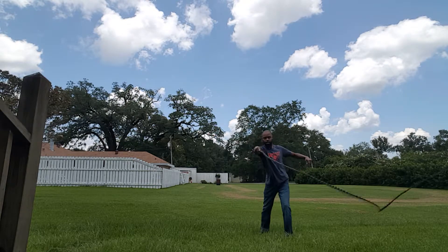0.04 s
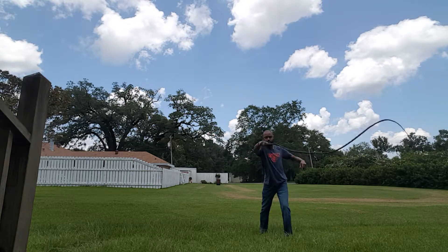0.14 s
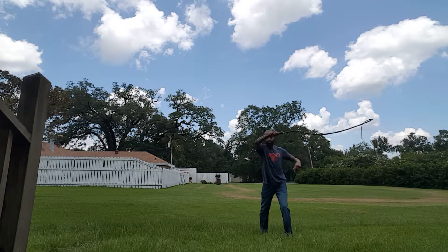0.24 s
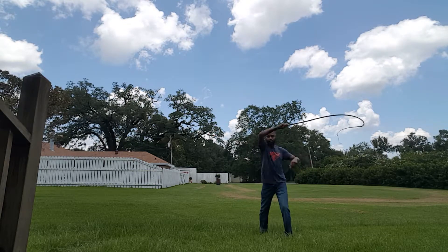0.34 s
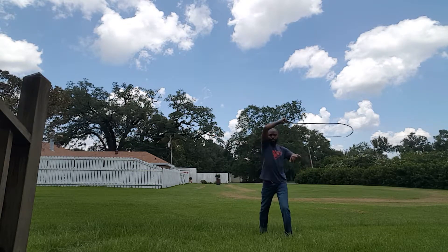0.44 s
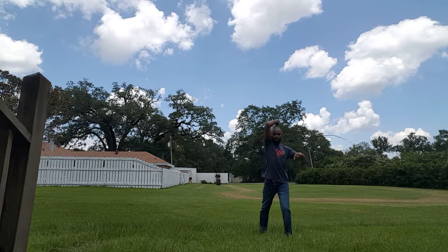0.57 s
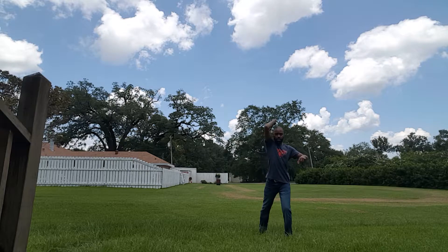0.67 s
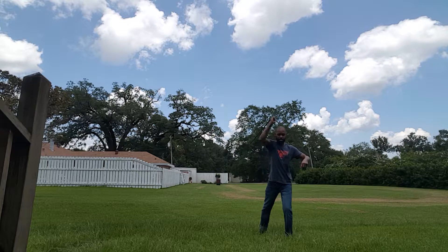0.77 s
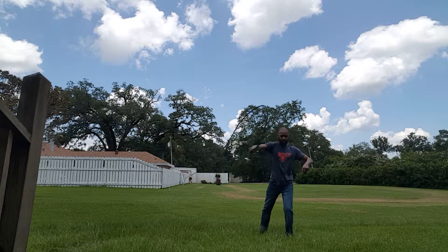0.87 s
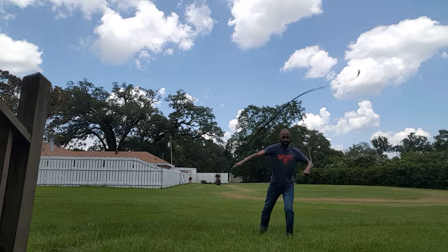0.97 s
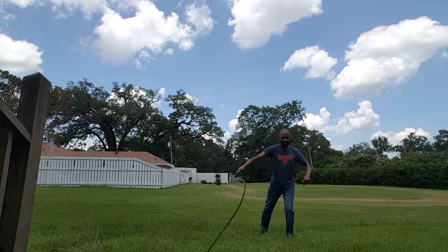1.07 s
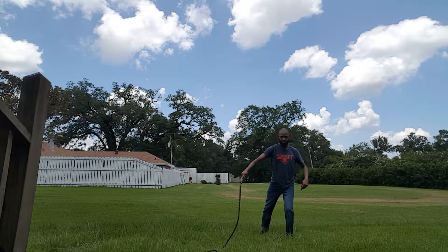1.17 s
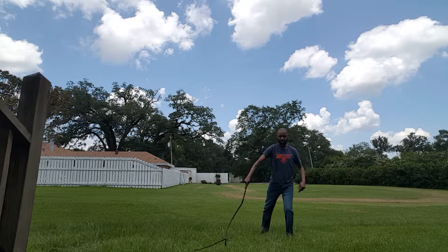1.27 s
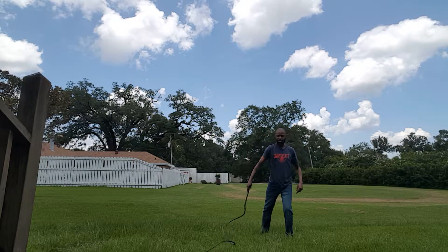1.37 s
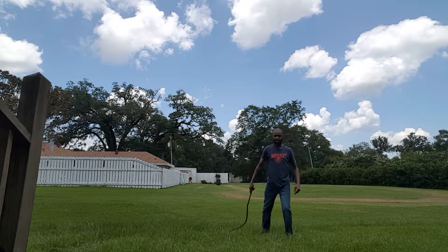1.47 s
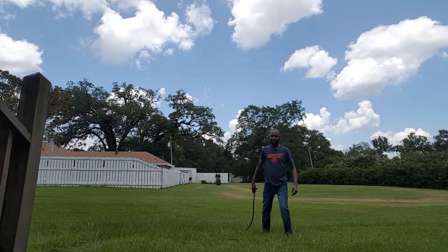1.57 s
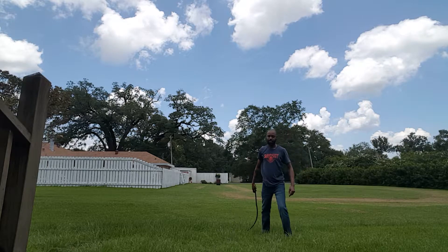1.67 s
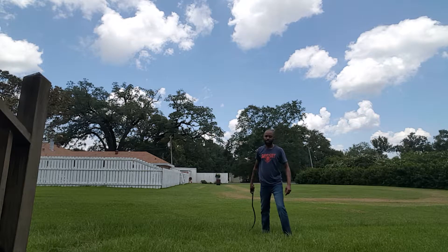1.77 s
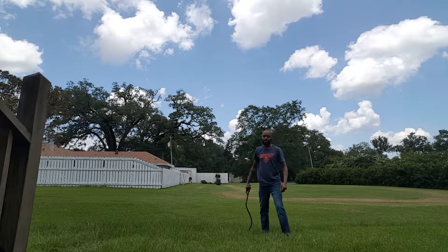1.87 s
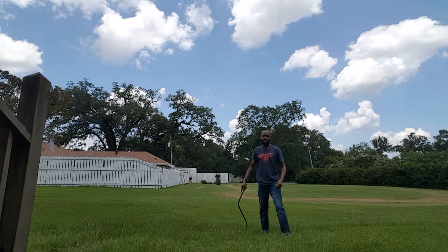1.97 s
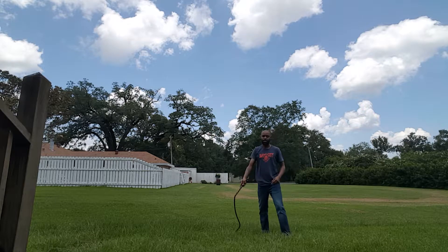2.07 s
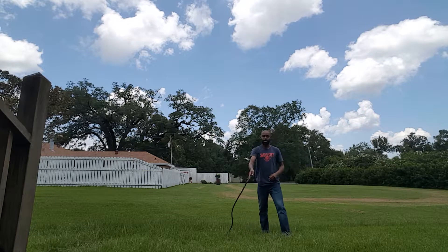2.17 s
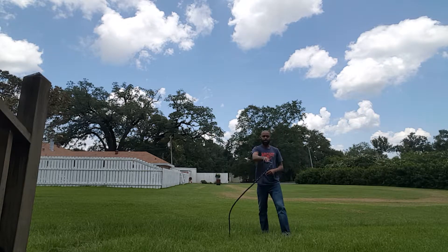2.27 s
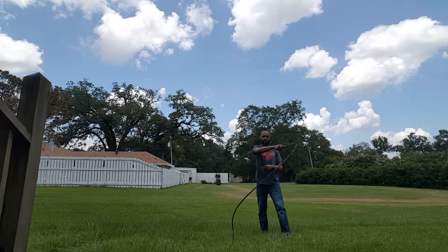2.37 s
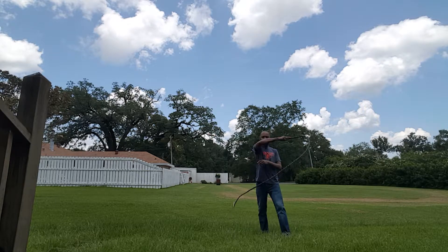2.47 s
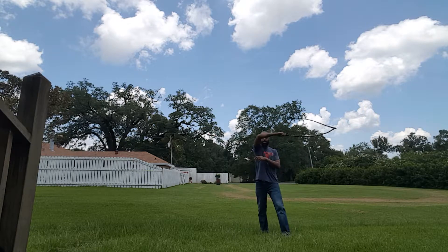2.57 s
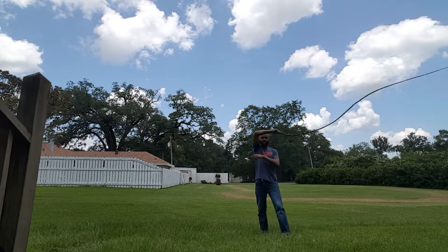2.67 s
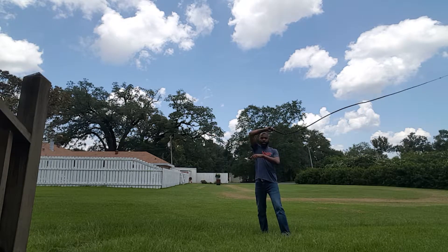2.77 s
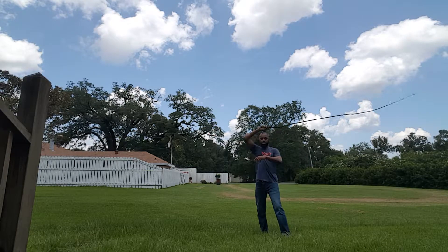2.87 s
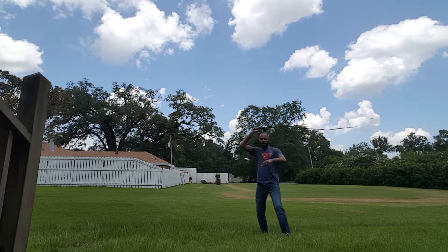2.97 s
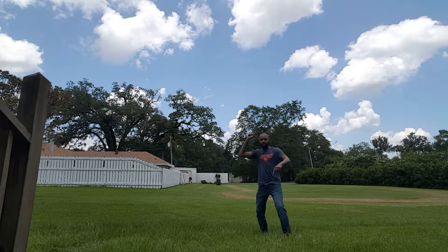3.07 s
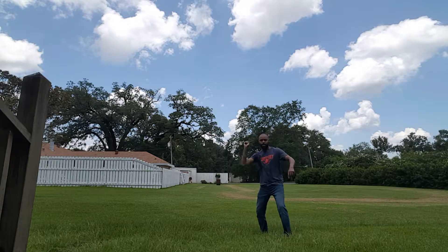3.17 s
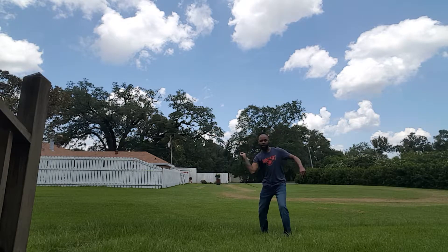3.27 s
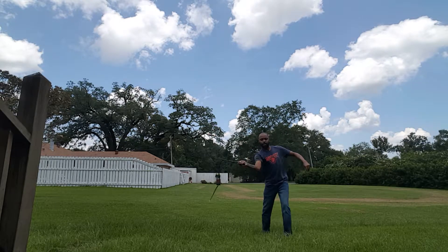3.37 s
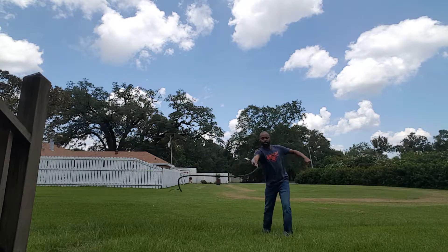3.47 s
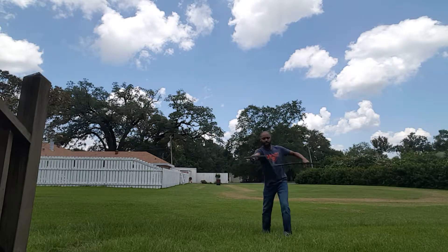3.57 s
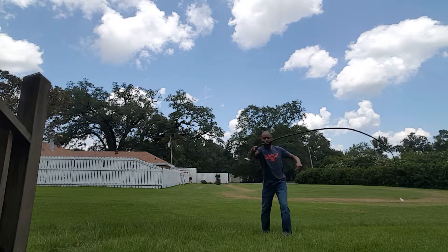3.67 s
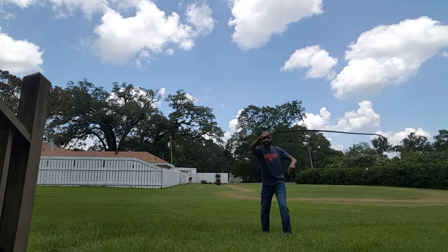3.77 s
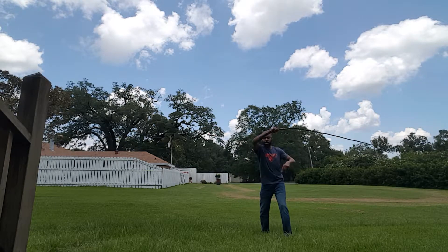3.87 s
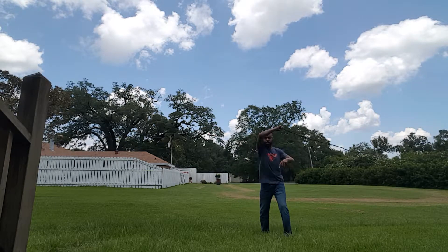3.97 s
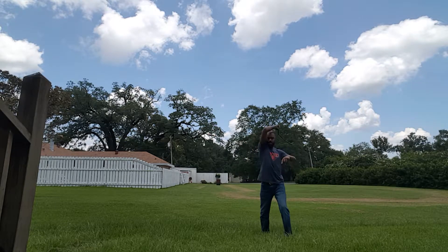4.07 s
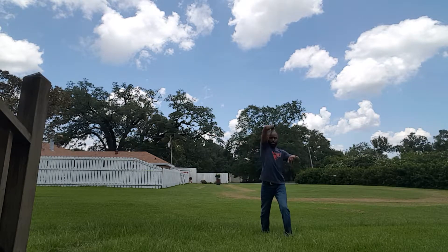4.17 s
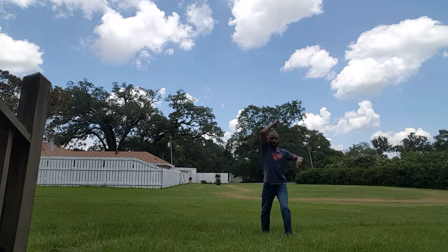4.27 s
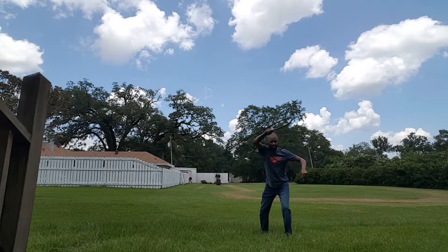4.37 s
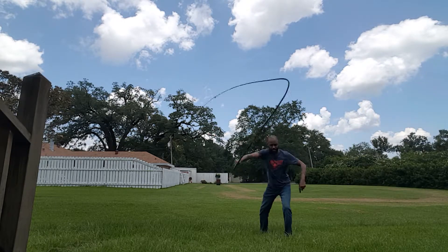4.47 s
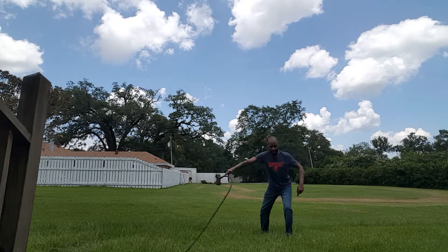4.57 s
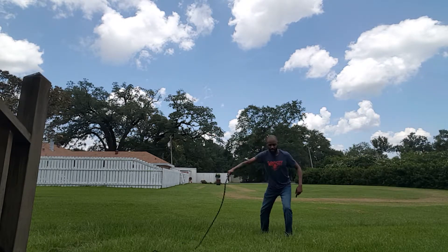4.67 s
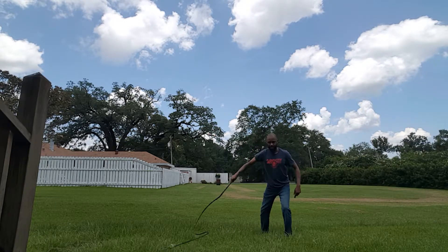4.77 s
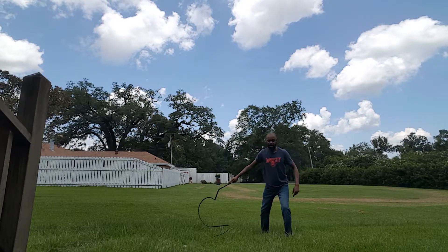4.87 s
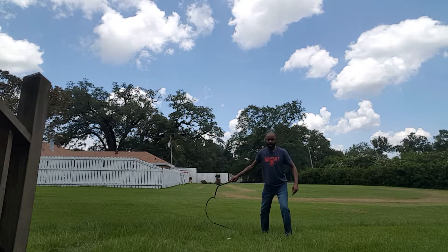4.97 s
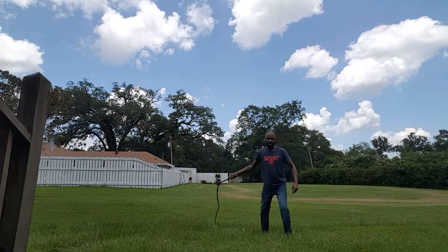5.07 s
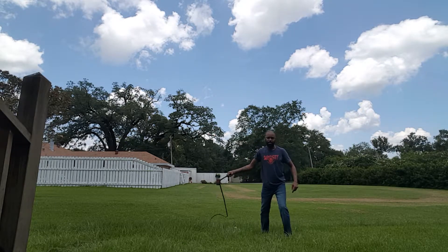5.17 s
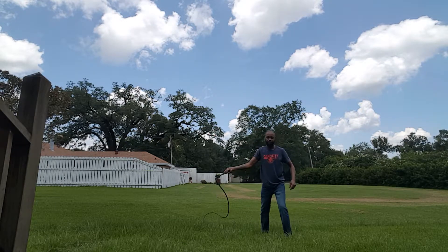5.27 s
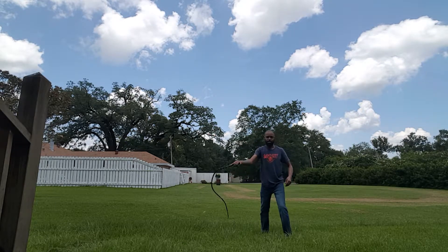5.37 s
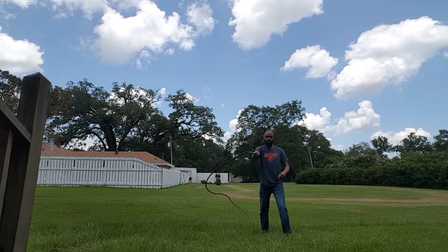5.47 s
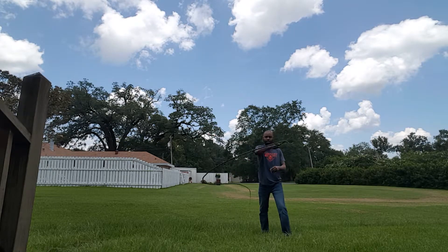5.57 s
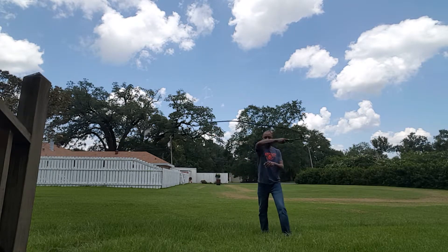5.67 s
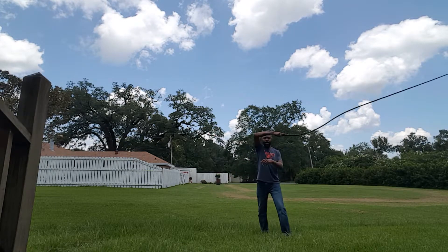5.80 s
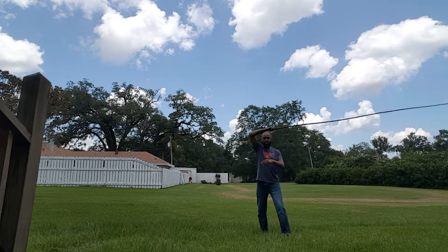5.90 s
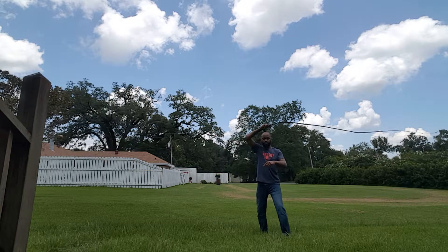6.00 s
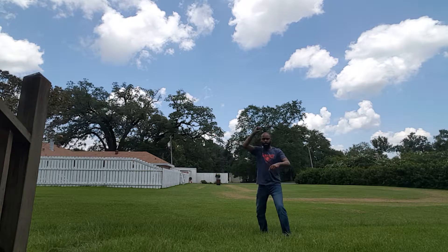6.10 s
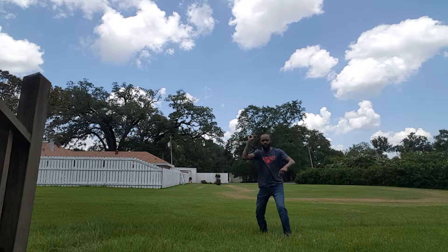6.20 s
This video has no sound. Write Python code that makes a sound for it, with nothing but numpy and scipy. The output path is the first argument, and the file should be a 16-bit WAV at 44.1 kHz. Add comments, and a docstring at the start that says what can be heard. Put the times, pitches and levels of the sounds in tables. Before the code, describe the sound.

A whip is cracked close by on an open lawn, over a steady low rumble of distant traffic. At 0.1 seconds a quick rising swish ends in a hard, doubled crack that overloads the microphone and briefly ducks the background. Thin whistles lead to a softer crack in rustling grass at 1.0 seconds, and far trees return a dull tick just after. Faint insects chirp from about 1.5 seconds, and cicadas swell until 3 seconds, then hold. A faint whistle passes at 2.7. At 3.6 a rising whoosh brings a second hard, overloading crack, followed at 4.6 by a falling swish and a softer crack with a grassy rustle. The cracks carry a tight slap from a nearby fence and house. Around 5.7 the whip whistles with a light flick, and a faint low whoosh follows near 6.1.

```python
"""Over a low traffic rumble and faint insects, a long whip whistles through the air and cracks on a lawn.
Twice a hard, close crack is followed by a softer one down in the grass; a light flick comes last.
The thong whistles by shedding swirls of air, and its tip cracks by making a shock wave. A fence, a house
and far trees send each crack back, and the cicadas swell. The hard cracks overload the microphone,
and its gain control turns everything down for a moment."""
import sys
import numpy as np
from scipy import signal
from scipy.fft import rfft, irfft, next_fast_len
from scipy.io import wavfile
from scipy.ndimage import uniform_filter1d, minimum_filter1d, map_coordinates

SR = 44100
rng = np.random.default_rng(int(sys.argv[2]) if len(sys.argv) > 2 else 0)


def to_wav(s):
    """Save 16-bit WAV."""
    ch = np.atleast_2d(s).T  # columns
    pcm = np.round(np.clip(ch, -1, 1) * 32767)  # PCM
    wavfile.write(sys.argv[1], SR, pcm.astype(np.int16))


N = 275184
T = np.arange(N) / SR

# how alike left and right are: f/Hz, likeness (1 = the same)
STEREO_LIKENESS = [(60, 1), (300, 0.93), (700, 0.5), (1500, 0.32), (4000, 0.087), (12000, 0.11)]
# tone colour of far traffic: f/Hz, level/dB
TRAFFIC_SPECTRUM = [(15, -38.5), (28, -27), (55, -3.5), (80, -7.5), (125, -0.5), (175, -6.5), (230, -13),
                    (330, -19.5), (900, -19), (1600, -28), (3000, -30.5), (7000, -41), (9500, -51),
                    (16000, -48)]
# tone colour of the cicadas: f/Hz, level/dB
CICADA_SPECTRUM = [(1500, -51.5), (2600, -8.5), (3450, -17), (4100, -6.5), (4500, -10), (5000, -7.5),
                   (5450, -16.5), (5800, -5.5), (6200, -1), (6800, -4.5), (7700, -13), (9200, -37),
                   (16000, -62)]
# the cicadas swell and hold: t/s, level/dB
CICADA_LEVELS = [(.9, -65), (2.85, -50), (6.24, -50.5)]
# small chirping insects: f/Hz, level/dB added to CHIRP_LEVELS, period/s, t/s of one chirp
CHIRPERS = [(2645, -2, .114, 2.43), (3210, -12.5, 0.1, 1.5), (3990, -16.5, 0.19, 3.3)]
# the chirping rises and fades: t/s, level/dB
CHIRP_LEVELS = [(.6, -66), (1.5, -54), (2.4, -53.5), (3.6, -61), (6.24, -62)]
# the thong cutting the air: t/s when fastest, length/s, f/Hz, glide/(octaves per s),
# note level/dB, air level/dB, note width as a share of its pitch
SWINGS = [(0.083, 0.13, 461, 24, -33, -42, 0.074), (0.883, 0.048, 2235, 14.5, -37, -47, 0.16),
          (0.939, 0.099, 2060, -3, -48.5, -46.5, .07), (1.005, 0.17, 539, -3, -45, -41.5, 0.38),
          (2.725, 0.18, 1448, -0.3, -47, -50.5, 0.045), (3.626, .1, 650, 26.5, -29, -29.5, 0.23),
          (4.489, 0.16, 1160, -3, -52.5, -43, .3), (4.54, 0.15, 391, -8.5, -34, -44, 0.39),
          (5.736, 0.056, 1857, 2, -38.5, -46.5, 0.086), (5.769, .05, 2687, -22, -24, -38, 0.069),
          (5.794, .1, 1808, -7, -35, -43, 0.32), (6.084, 0.14, 200, 4, -41.5, -59, 0.81)]
# tone colour of the rushing air: f/Hz, level/dB
AIR_SPECTRUM = [(100, -14), (400, 2.5), (1100, -1), (2400, -3.5), (4000, -11.5), (10000, -25),
                (16000, -34.5)]
# the cracks: t/s, shock level/dB, half length/ms, edge as a share of that, side (- left, + right),
# wake level/dB, tree echo level/dB
WHIP_CRACKS = [(0.0869, -1.5, 0.073, 0.18, 0.57, -13, -55), (0.104, 16.5, 0.32, .03, 0.063, -5, -35.5),
               (1.0445, 2.5, 0.31, 0.85, -0.66, -45, -24.5), (3.6261, 15.5, 0.3, 0.027, 0.62, -2, -34),
               (4.585, 0.5, .39, 0.65, -1.26, -5.5, -29.5), (5.7445, -16.5, 0.51, 0.4, 0.69, -39, -65)]
# tone colour of the fibres at the tip: f/Hz, level/dB
SNAP_SPECTRUM = [(200, -19), (900, -5), (2200, 6.5), (3800, 2), (6000, -8), (8300, -6.5), (10000, -13.5),
                 (16000, -14.5)]
# how the yard colours what it scatters: f/Hz, level/dB
YARD_SPECTRUM = [(40, -14), (150, 4), (350, -7), (750, -2), (1400, 0.5), (2300, -1.5), (3500, -5),
                 (5000, -12), (8300, -6), (10000, -17), (16000, -7)]
# how fast the scatter dies: f/Hz, t60/s (a t60 is the time to fade by 60 dB)
YARD_FADES = [(100, .15), (700, 0.16), (2000, 0.15), (8000, 0.11), (15000, .115)]
# echoes off fence and house: delay/s, level/dB against the shock, stretch of its length
WALL_ECHOES = [(.0094, -6, 0.84), (0.0165, -9, 1)]
# the lash sweeping through grass: t/s, level/dB, rise/s
GRASS_SWEEPS = [(.203, -43, .012), (1.0433, -15.5, .002), (1.135, -30.5, 0.016), (2.527, -45, 0.048),
                (4.583, -13, .002), (4.691, -33, 0.078), (5.744, -37.5, 0.0041)]
# tone colour of the grass: f/Hz, level/dB
GRASS_SPECTRUM = [(60, -17), (250, 4), (900, 1.5), (1700, 0), (2600, 0.5), (5000, -7.5), (8400, -3),
                  (9500, -12.5), (14000, -9.5), (16000, -16)]


def amp(db):
    """Turn decibels into a gain."""
    return 10 ** (np.asarray(db) / 20)


def unit(x):
    """Scale a signal to an average (rms) level of 1."""
    return x / np.sqrt(np.mean(x ** 2) + 1e-20)


def along(points, hz):
    """Read a table between its rows, on a log frequency scale."""
    freqs, values = np.transpose(points)
    return np.interp(np.log(hz + 1), np.log(freqs + 1), values)


def wobble(rate):
    """A smooth random curve through `rate` points a second."""
    return map_coordinates(rng.standard_normal(int(N * rate / SR) + 4), [T * rate])


def pan(balance_db):
    """Left and right gains; above 0 leans left."""
    return amp([[balance_db / 2], [-balance_db / 2]])


def noise(gain, size=N, lag_ms=0):
    """Stereo noise shaped by gain(hz), nearly mono in the bass; the left side may lag."""
    hz = np.fft.rfftfreq(size, 1 / SR)
    spread = np.arccos(np.clip(along(STEREO_LIKENESS, hz), -1, 1)) / 2
    mid, side = rfft(rng.standard_normal((2, size))) * gain(hz) * [np.cos(spread), np.sin(spread)]
    lag = np.exp(-2j * np.pi * hz * lag_ms / 1000)
    return unit(irfft(np.array([(mid + side) * lag, mid - side]), size))


def add(out, s, x):
    """Mix x into out, starting at s seconds."""
    part = out[:, max(round(s * SR), 0):][:, :x.shape[1]]
    part += x[:, :part.shape[1]]


def arrival_times(s, side, lag_ms=0.25):
    """A start just before s, and a clock for each channel: the nearer one hears the sound first."""
    start = round((s - .01) * SR) / SR
    half_lag = side * lag_ms / 2000
    return start, start - s + np.arange(SR // 2) / SR - np.array([[half_lag], [-half_lag]])


def traffic(level_db=-43, flutter_db=1.02):
    """Far traffic rumbles steadily, off to the right."""
    rumble = noise(lambda hz: amp(along(TRAFFIC_SPECTRUM, hz)), lag_ms=0.39)
    return pan(-1.6) * amp(level_db + flutter_db * wobble(7.7)) * rumble


def insects(chirp_width_hz=38, unsteady=0.13):
    """A cicada chorus swells while a few small insects chirp, each at its own pace."""
    chorus_db = np.interp(T, *np.transpose(CICADA_LEVELS))
    chirp_db = np.interp(T, *np.transpose(CHIRP_LEVELS))
    out = amp(chorus_db + .5 * wobble(7.2)) * noise(lambda hz: amp(along(CICADA_SPECTRUM, hz)))
    for call_hz, db, period, s in CHIRPERS:
        beat = .5 + .5 * np.cos(2 * np.pi * ((T - s) / period + unsteady * wobble(3.4)))
        note = noise(lambda hz: np.exp(-((hz - call_hz) / chirp_width_hz) ** 2))
        out += amp(chirp_db + db) * beat * note
    return pan(-1.4) * out


def fence(x, db, delay_s=0.011):
    """The fence repeats a sound a moment later, boosting some pitches and thinning others."""
    copy = np.pad(x, ((0, 0), (round(delay_s * SR), 0)))[:, :N]
    return (x + amp(db) * copy) / np.hypot(1, amp(db))


def swishes(rise_share=0.54, sag_octaves=.33, swell=1.3):
    """Swirls shed by the thong sing a breathy, gliding note; pitch and level sag when it moves slowly."""
    out = np.zeros((2, N))
    for fastest, length, centre_hz, glide, note_db, air_db, width in SWINGS:
        start = fastest - rise_share * length
        t = T[(T >= start) & (T < start + length)]
        speed = np.interp(t, [start, fastest, start + length], [0, 1, 0])
        pitch = centre_hz * 2 ** (glide * (t - fastest) - sag_octaves * (1 - speed) ** 2)
        swirls = noise(lambda hz: 1 / (1 + (hz / (width * centre_hz)) ** 2), size=SR // 2)
        phase = 2 * np.pi * np.cumsum(pitch) / SR
        steady = np.exp(-width / .2)  # narrow whistles have a clean core
        note = unit((steady + swirls[:, :len(t)]) * np.cos(phase) + swirls[:, -len(t):] * np.sin(phase))
        air = noise(lambda hz: amp(along(AIR_SPECTRUM, hz)), size=SR // 2)[:, :len(t)]
        add(out, t[0], speed ** swell * (amp(note_db) * note + amp(air_db) * air))
    return pan(-3.5) * out


def shock(t, half_ms, edge):
    """A shock wave shaped like an N: pressure builds, flips over at t = 0 and relaxes."""
    half_lengths = t * 1000 / half_ms
    wave = -np.tanh(half_lengths / edge) * np.exp(-np.abs(half_lengths))
    return wave / np.abs(wave).max()


def cracks(snap_db=-15.5, snap_t60=0.024, wake_peak_s=0.0013, usual_half_ms=0.42):
    """The tip's shock, the snap of its fibres, a slower pressure swing behind it, and the scatter."""
    near, scatter = np.zeros((2, 2, N))
    for s, db, half_ms, edge, side, wake_db, _ in WHIP_CRACKS:
        start, t = arrival_times(s, side)
        after = np.maximum(t, 0)
        stretch = half_ms / usual_half_ms
        place = pan(-1 - side)
        direct = shock(t, half_ms, edge)
        fibres = noise(lambda hz: amp(along(SNAP_SPECTRUM, hz)), size=t.shape[1])
        snap = (t > 0) * amp(snap_db - 60 * after / snap_t60) * fibres
        wake_hz = 313 / stretch ** 0.37  # shorter shocks swing faster
        wake_level = amp(wake_db) * after / wake_peak_s * np.exp(1 - after / wake_peak_s)
        wake = -wake_level * np.sin(2 * np.pi * wake_hz * t)
        add(near, start, place * (amp(db) * (direct + snap) + wake))
        add(scatter, s, place * amp(db - 13.5) * np.sqrt(stretch) * yard_scatter(direct[0]))
    return near + pan(-1.5) * fence(scatter, db=-11)


def yard_scatter(wave, build_s=0.012, late_db=-40, late_t60=0.86, clump_db=4):
    """Fence, house and ground break a wave into a cloud of small echoes that builds up and dies."""
    cloud = noise(lambda hz: np.abs(rfft(wave)) * amp(along(YARD_SPECTRUM, hz)), size=len(wave))
    cloud = unit(cloud * amp(clump_db * np.tanh(wobble(350)[:len(wave)])))
    hz, t, bands = signal.stft(cloud, SR, nperseg=128)
    rise = np.sqrt(np.minimum(t / build_s, 1))
    early = amp(-60 * np.maximum(t - build_s, 0) / along(YARD_FADES, hz)[:, None])
    late = amp(late_db - 60 * t / late_t60)
    return signal.istft(bands * (early + late) * rise, SR, nperseg=128)[1]


def wall_slaps(edge=0.51):
    """Fence and house each send back one strong copy of every shock, with a rounded edge."""
    out = np.zeros((2, N))
    for s, db, half_ms, _, side, *_ in WHIP_CRACKS:
        for delay, wall_db, stretch in WALL_ECHOES:
            start, t = arrival_times(s + delay, side)
            add(out, start, amp(db + wall_db) * shock(t, half_ms * stretch, edge))
    return out


def grass_rustles(sweep_t60=.22, drag_db=-33.5, drag_t60=2.2, blade_db=1.5, tuft_db=2):
    """The lash tears through grass, then drags on faintly: tiny blade ticks, bunched tuft by tuft."""
    level = np.zeros(N)
    for s, db, rise_s in GRASS_SWEEPS:
        after = np.maximum(T - s, 0)
        rise = np.exp(np.minimum(T - s, 0) / rise_s)
        fade = amp(-60 * after / sweep_t60) + amp(drag_db - 60 * after / drag_t60)
        level += amp(db) * rise * fade
    ticks = unit(amp(blade_db * wobble(1100) + tuft_db * wobble(150)))
    return level * ticks * noise(lambda hz: amp(along(GRASS_SPECTRUM, hz)))


def tree_echoes(delay_s=.3015, centre_hz=1530, octaves=0.99, tick_t60=0.0088, trail_t60=0.26):
    """The far trees send each crack back as a dull tick with a leafy trail."""
    out = np.zeros((2, N))
    t = np.arange(SR // 3) / SR
    rise = 1 - np.exp(-t / 0.0004)
    fade = amp(-60 * t / tick_t60) + amp(-13 - 60 * t / trail_t60)
    for s, *_, echo_db in WHIP_CRACKS:
        band = noise(lambda hz: 1 / (1 + (np.log2((hz + 1) / centre_hz) / octaves) ** 2) ** 2.1, len(t))
        add(out, s + delay_s, amp(echo_db) * band * rise * fade)
    return out


def scene():
    """The whip and the lawn around it."""
    whip = cracks() + wall_slaps() + swishes() + fence(grass_rustles(), db=-13) + tree_echoes()
    return whip + fence(insects(), db=-5) + traffic()


def gain_control(x, limit_db=-5, hold_s=0.66, release_db_per_s=35, attack_s=0.003):
    """A level over the limit pulls the gain down; it waits, then creeps back."""
    power = np.abs(uniform_filter1d(x ** 2, size=88)).max(axis=0)
    over_db = np.maximum(10 * np.log10(power + 1e-12) - limit_db, 0)
    half_hold = int(hold_s * SR / 2)
    held_db = -minimum_filter1d(-over_db, 2 * half_hold + 1, origin=half_hold, mode="constant")
    cut_db = np.maximum.accumulate(held_db + release_db_per_s * T) - release_db_per_s * T
    smoothing = np.exp(-1 / (attack_s * SR))
    return x * amp(-signal.lfilter([1 - smoothing], [1, -smoothing], cut_db))


def record(dry, thud_hz=62, top_hz=16200):
    """Shocks outrun the gain control and clip, leaving a low thud; the highest treble is cut off."""
    levelled = gain_control(dry)
    clipped = np.clip(levelled, -.95, .95)
    overload = np.tanh(np.abs(levelled - clipped))
    # each overload pushes the input off its resting point, and it settles slowly
    thud = signal.lfilter(*signal.butter(1, [thud_hz / 2, thud_hz * 2], "band", fs=SR), overload)
    thud = amp(2) * signal.lfilter(*signal.butter(1, thud_hz * 2, fs=SR), thud)
    size = next_fast_len(N + SR // 2)
    treble_cut = 1 / (1 + (np.fft.rfftfreq(size, 1 / SR) / top_hz) ** 120)
    return irfft(rfft(clipped + thud, size) * treble_cut, size)[:, :N]


dry = scene()
out = record(dry)
to_wav(out)
```